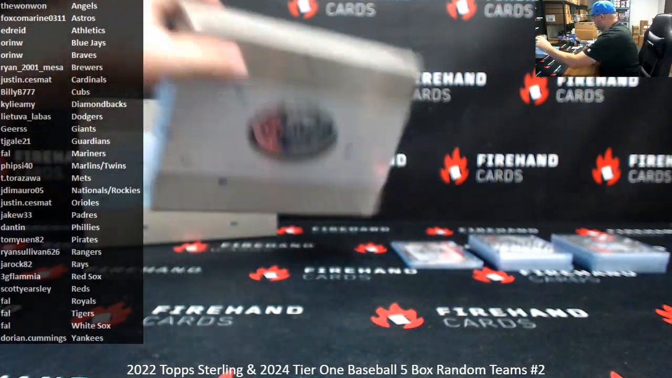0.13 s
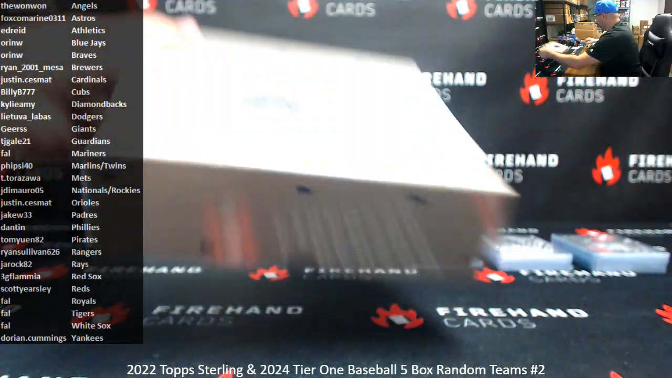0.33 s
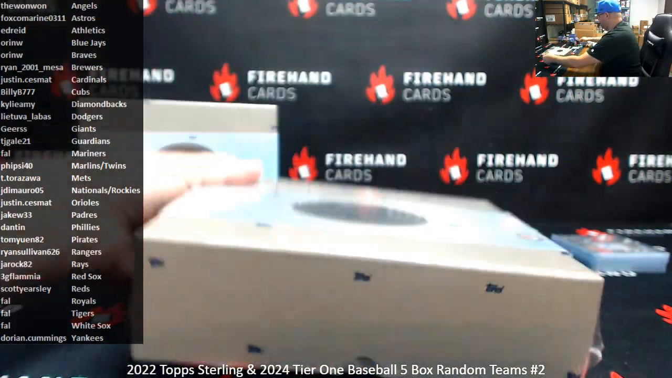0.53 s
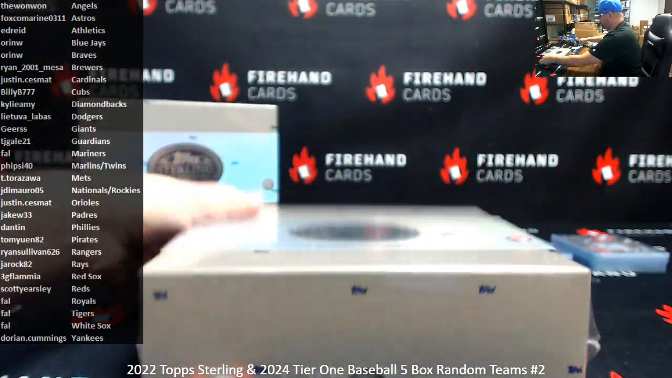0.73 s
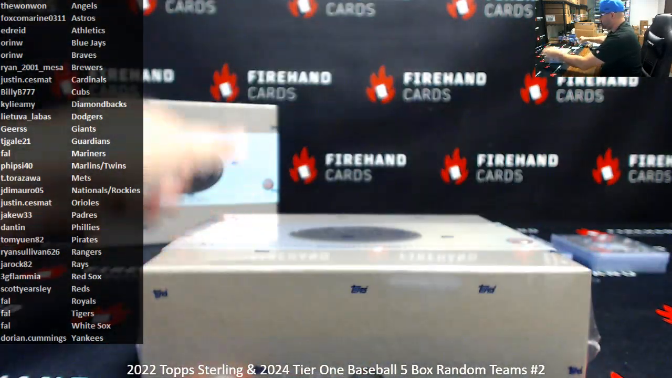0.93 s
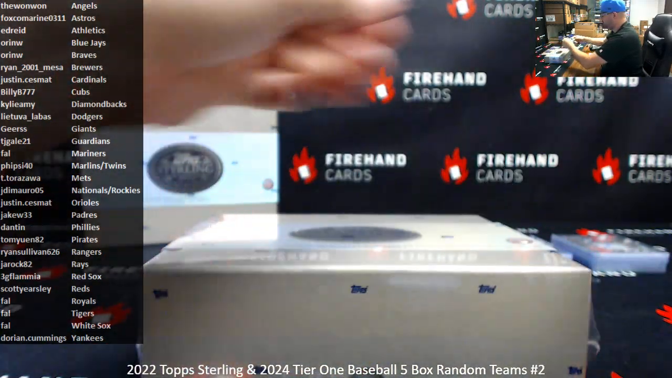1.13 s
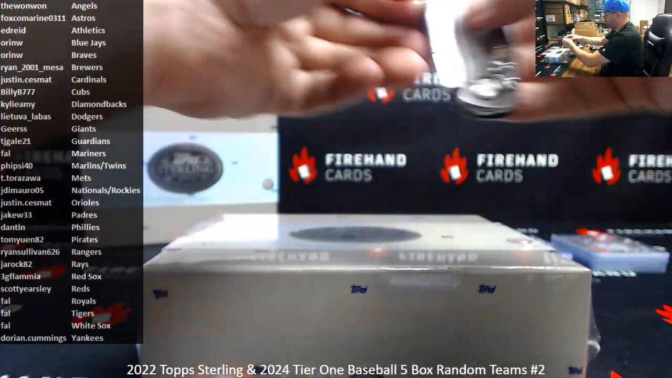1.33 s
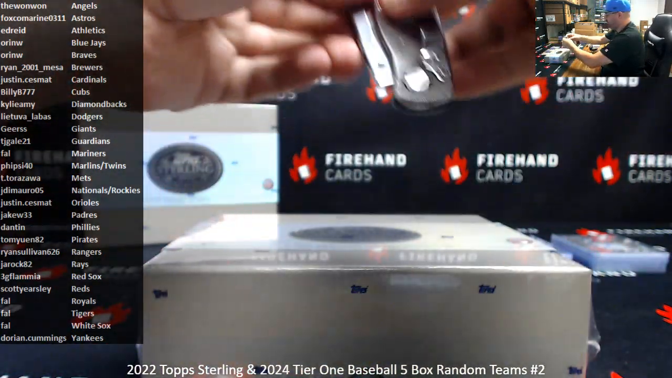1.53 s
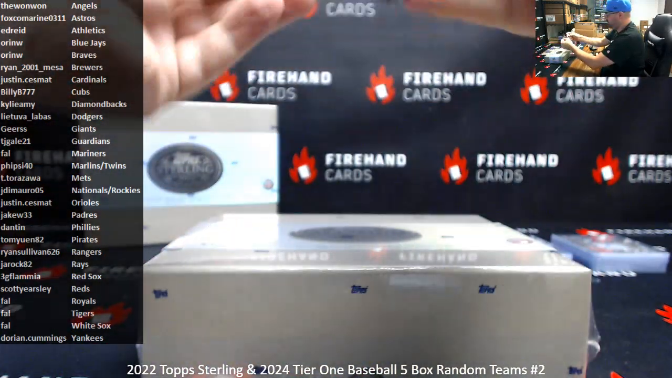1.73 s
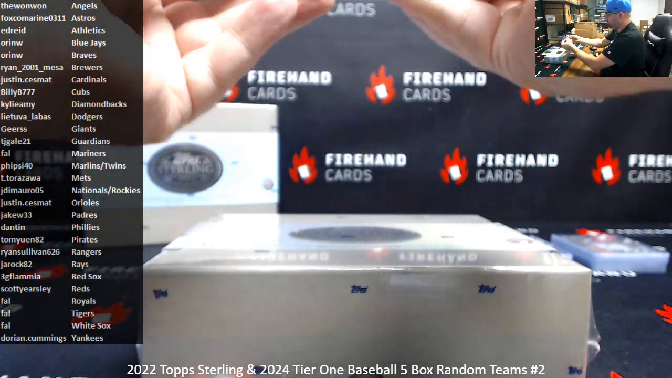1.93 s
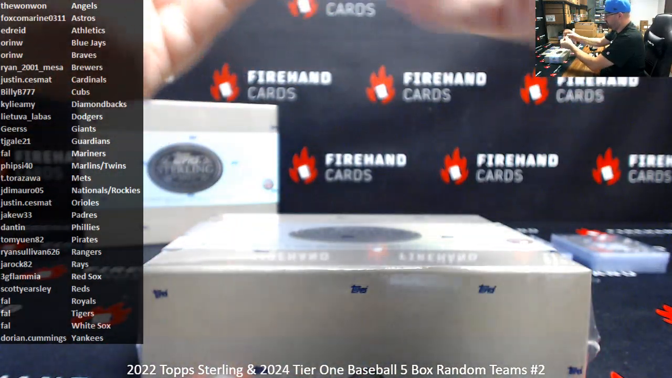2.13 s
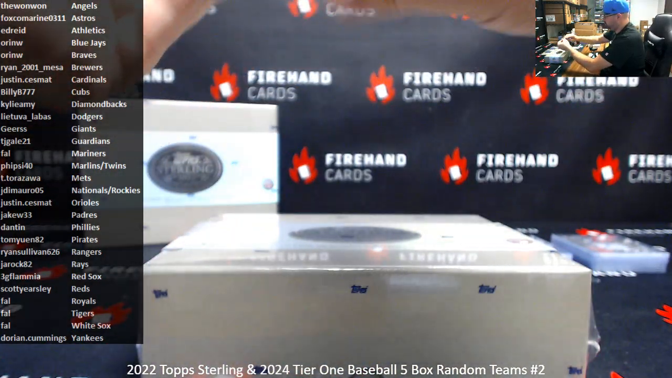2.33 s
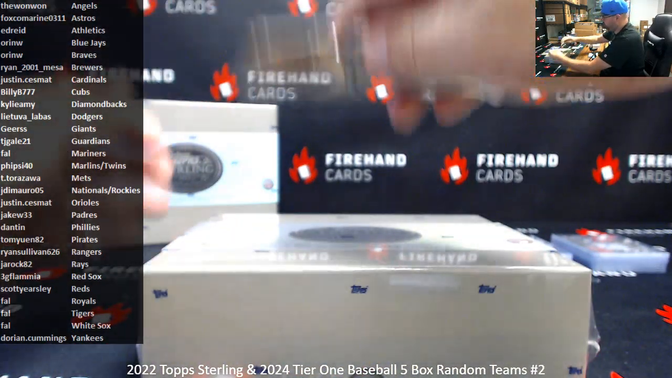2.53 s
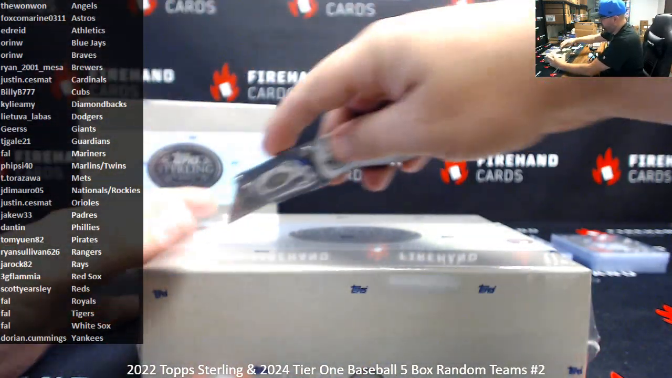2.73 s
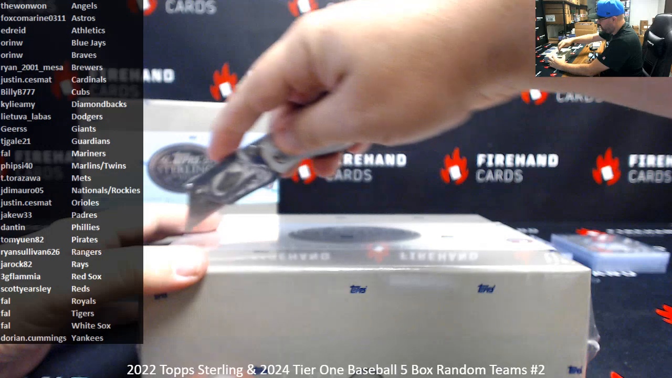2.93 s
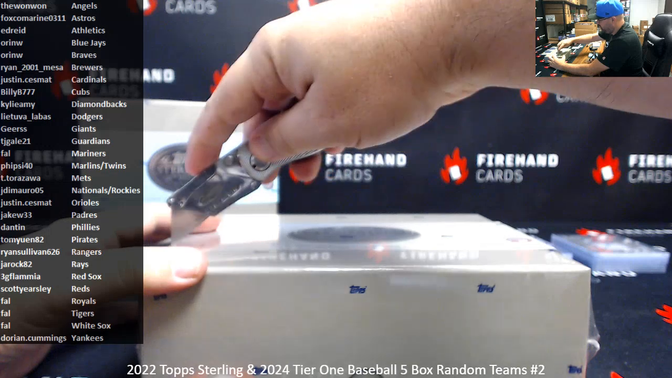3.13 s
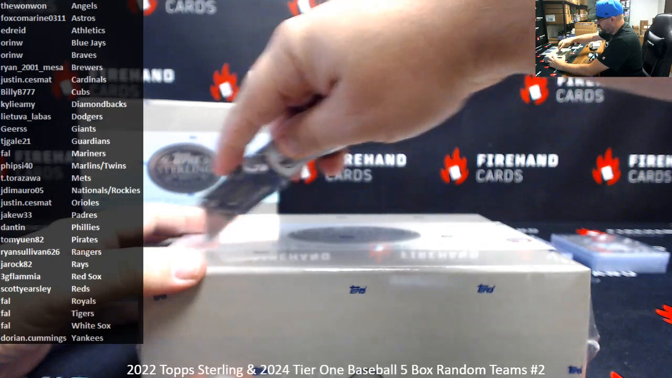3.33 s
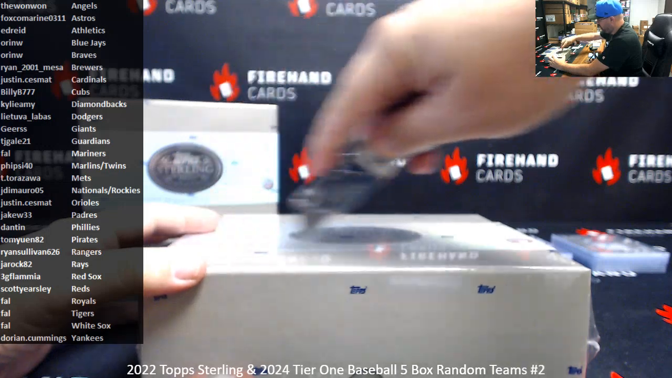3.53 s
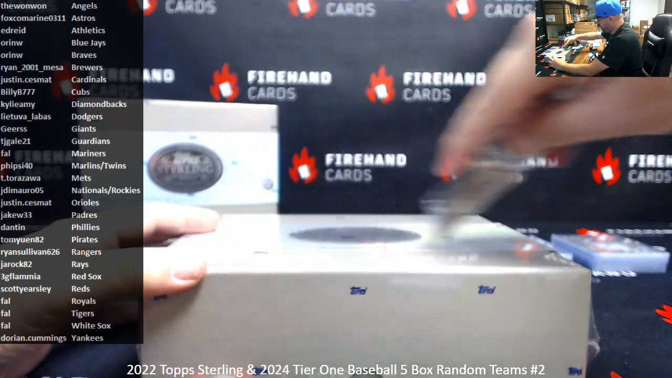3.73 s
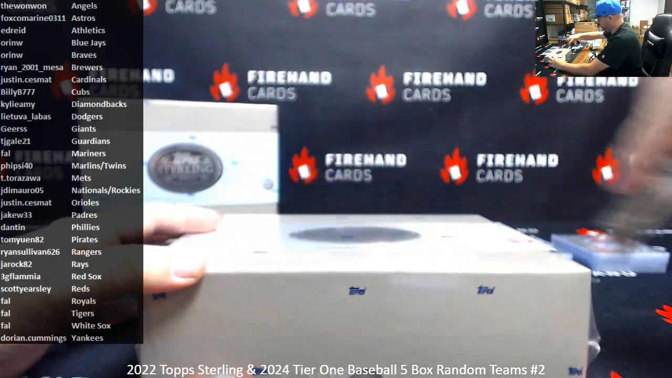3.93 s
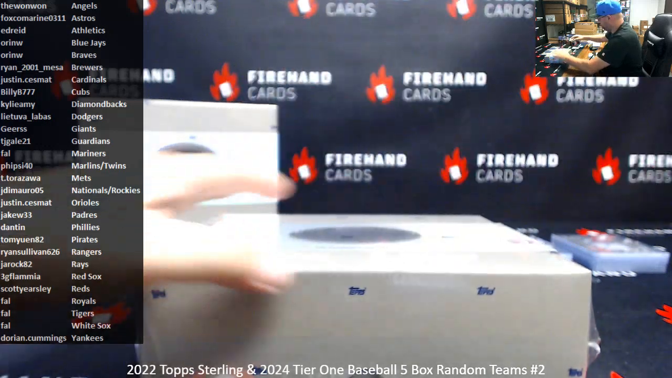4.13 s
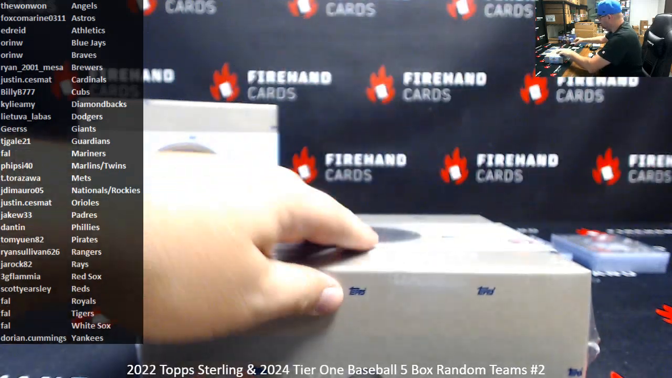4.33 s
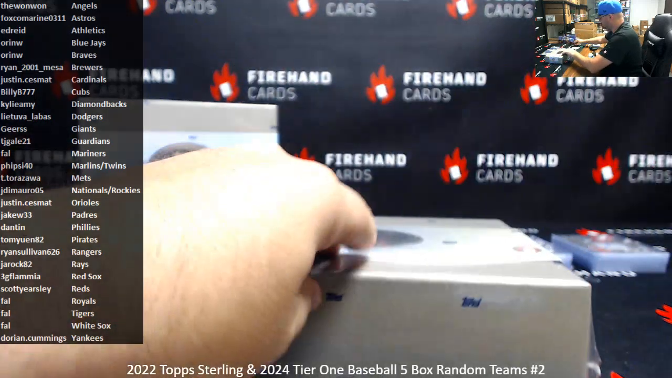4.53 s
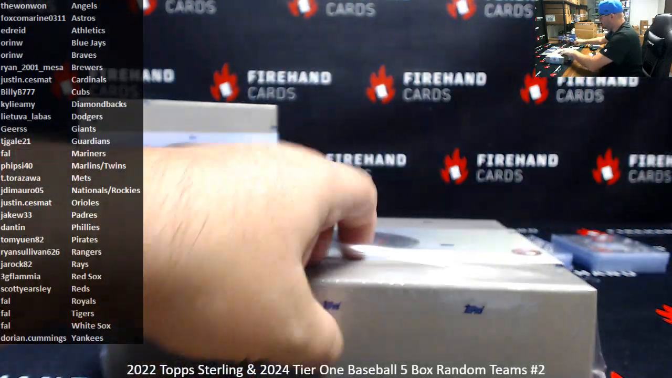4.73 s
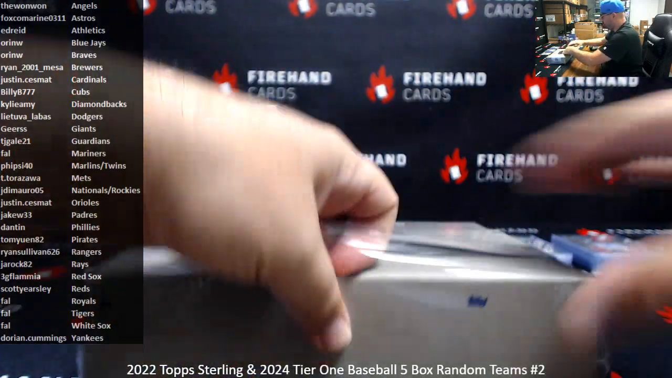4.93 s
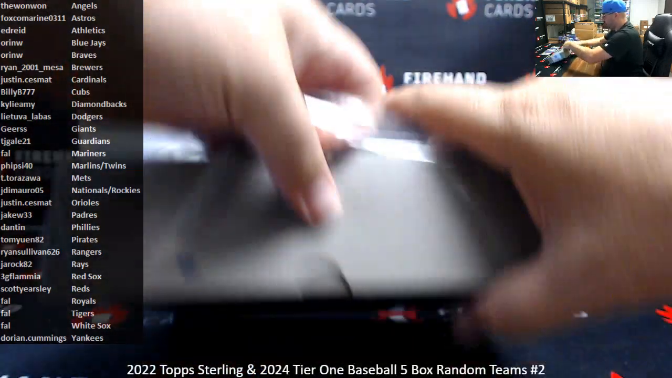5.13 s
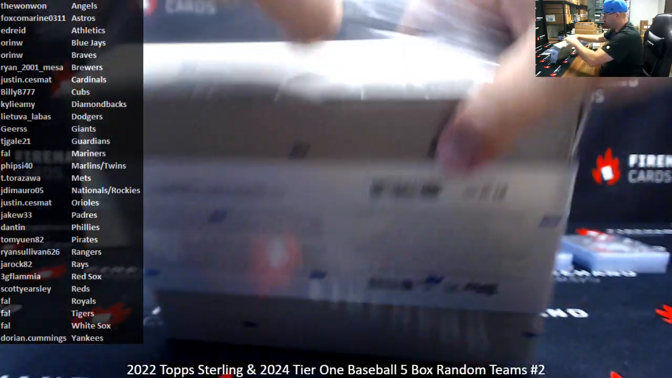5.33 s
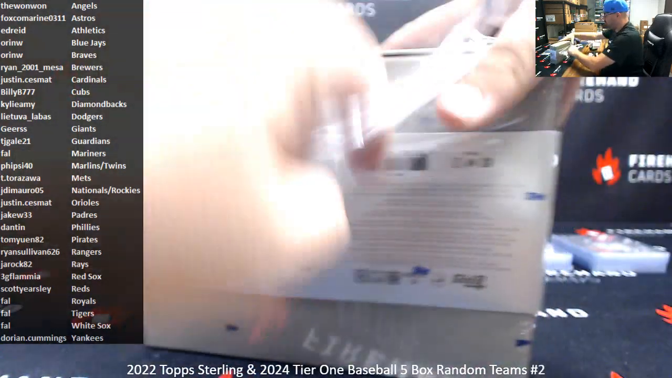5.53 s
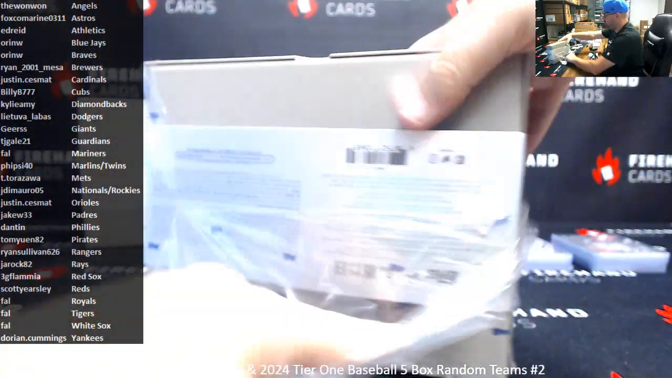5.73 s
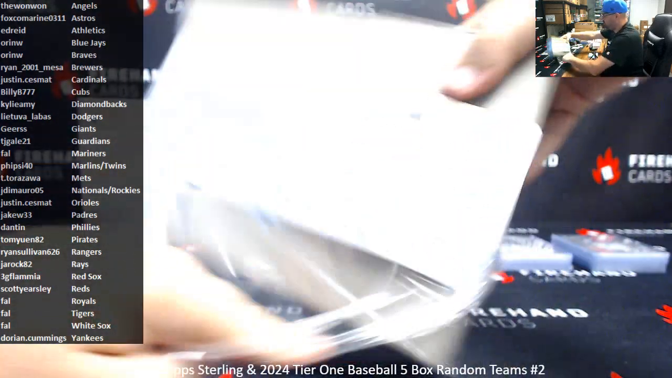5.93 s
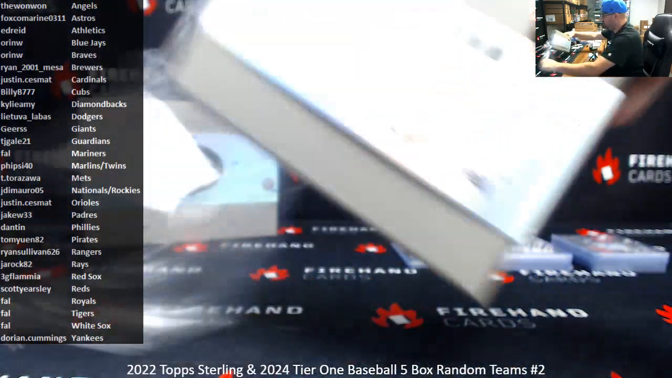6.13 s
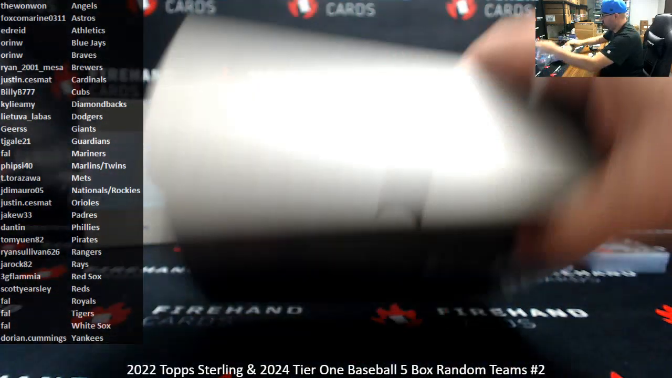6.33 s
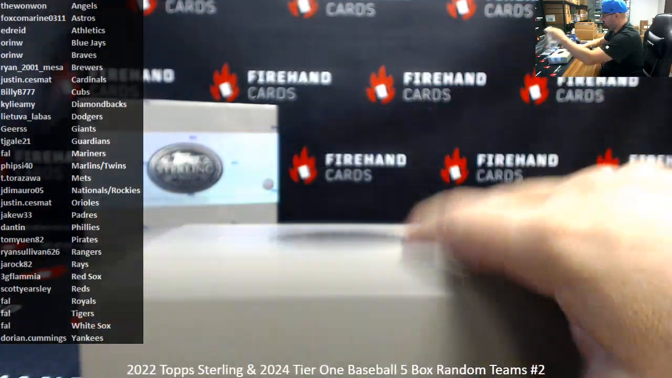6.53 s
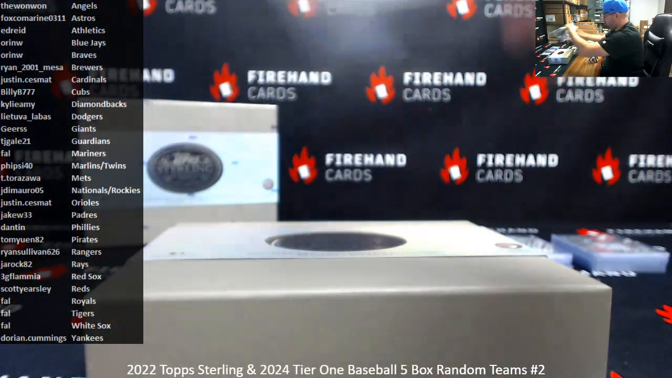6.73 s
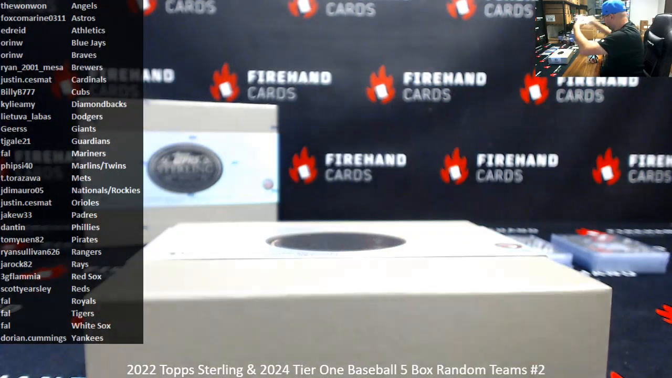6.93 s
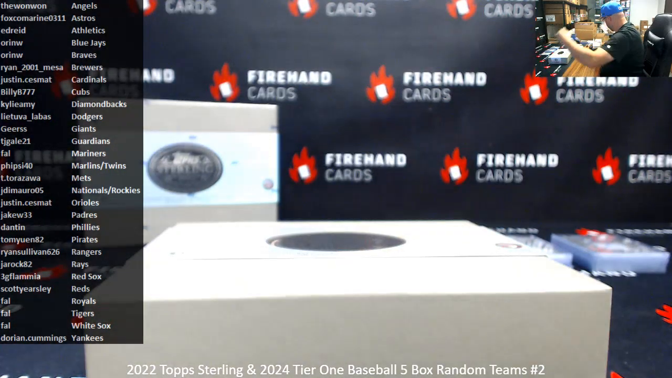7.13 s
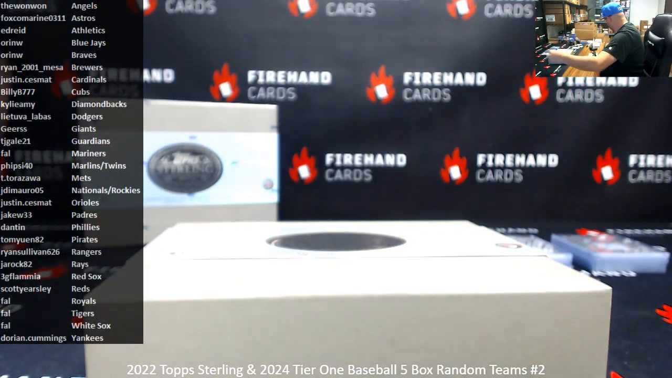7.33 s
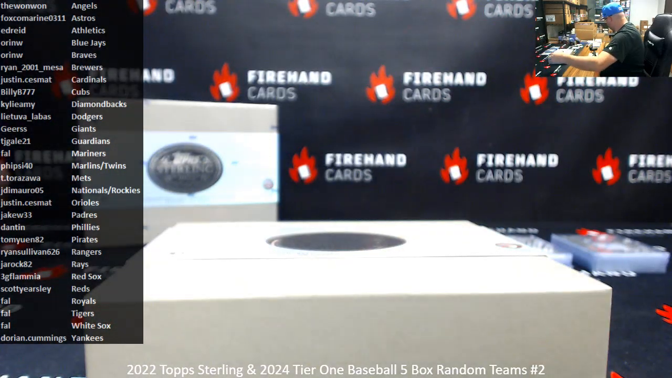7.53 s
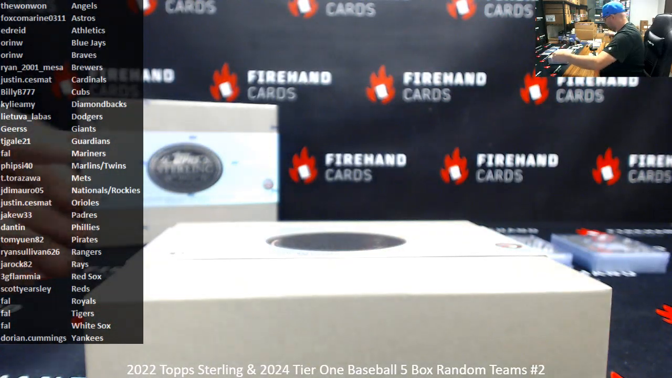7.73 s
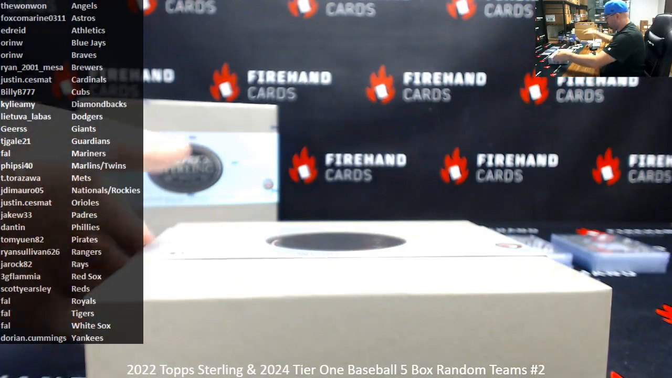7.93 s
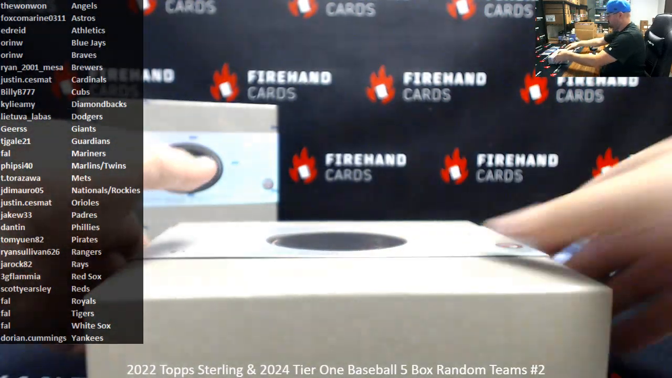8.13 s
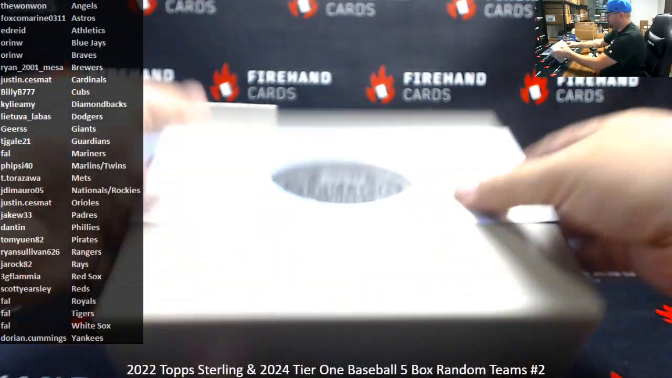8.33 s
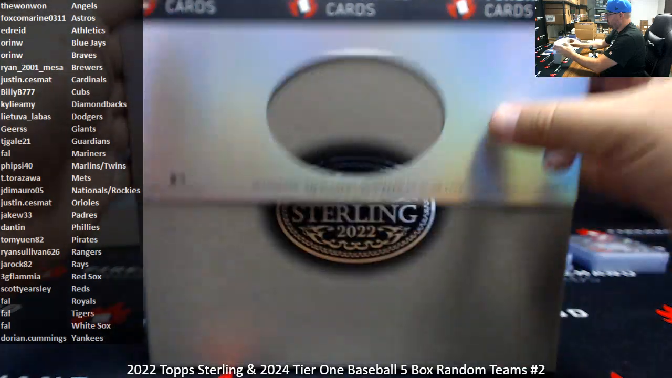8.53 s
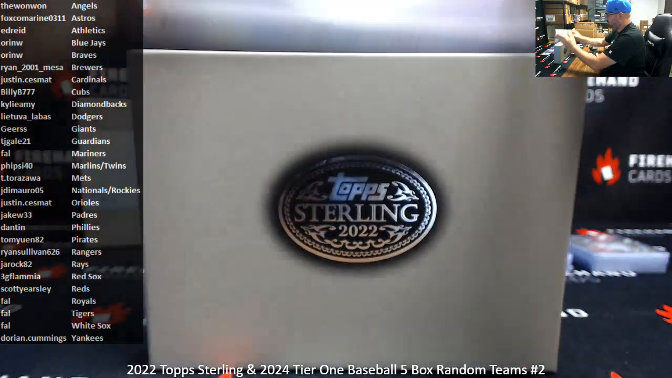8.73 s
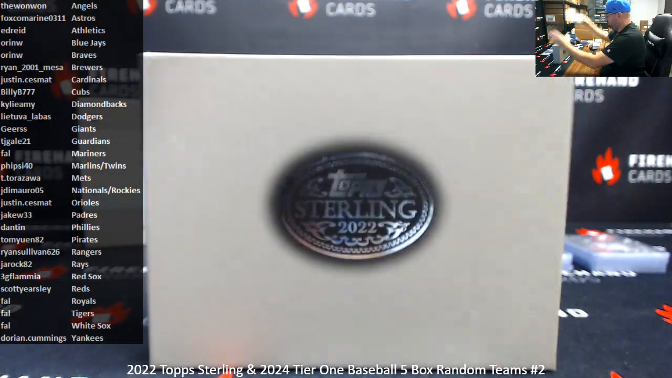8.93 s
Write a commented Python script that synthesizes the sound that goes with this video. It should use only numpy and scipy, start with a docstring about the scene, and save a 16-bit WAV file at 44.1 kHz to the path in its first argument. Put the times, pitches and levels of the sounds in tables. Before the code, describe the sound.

A wrapped cardboard box thumps onto a table, a folding knife squeaks and snaps open, slits the film, then crackling wrap is pulled off.

```python
"""A shrink-wrapped cardboard box is set down on a table in a small room, close to the microphone.
A folding knife squeaks open, locks with a snap and slits the wrap; the film is pulled off, crackling.
The bare box is knocked down on the table, then tipped up again, rubbing under the fingers.
Blows ring the box's modes, trains of tiny slips make the rubbing and cutting, sines squeak and ring
as steel, and shaped noise gives the cracks, the hush and the sway of the table."""
import sys
import numpy as np
from scipy import signal
from scipy.fft import rfft, irfft, next_fast_len
from scipy.io import wavfile

SR = 44100
rng = np.random.default_rng(int(sys.argv[2]) if len(sys.argv) > 2 else 0)


def log_audio(samples):
    """Write samples as a 16-bit WAV file to the path given in sys.argv[1]."""
    # one column per channel
    frames = np.atleast_2d(samples).T
    # limit to full scale, then quantise
    limited = np.clip(frames, -1, 1)
    pcm = np.round(limited * 32767).astype(np.int16)
    wavfile.write(sys.argv[1], SR, pcm)


N = 400869
TIME = np.arange(N) / SR  # s

# Levels in the tables are relative within their layer; each layer's function trims the whole.
# blows on the box; an edge landing adds thud and clap:
# (t/s, hollow boom level/dB, table thud re boom/dB, wall clap re boom/dB)
BLOWS = [(0.107,-37,-17,-10), (0.362,-31.5,2,-2), (0.413,-39.5,-24,-8.5), (0.587,-49.5,9,-3.5),
         (0.595,-20.5,-12.5,-19), (2.975,-57,10.5,-5), (3.749,-59,16.5,12), (4.159,-61,13,2),
         (4.511,-40,-3.5,-11), (4.64,-35.5,0.5,-4.5), (5.047,-31,1.5,-6), (5.192,-39,3,-8),
         (5.28,-36,-13,-10.5), (5.441,-33.5,-7.5,-11), (5.591,-49.5,-6,-15), (5.877,-37,-7.5,-15.5),
         (6.239,-35.5,3.5,-7.5), (6.291,-23.5,1,-0.5), (6.415,-10.5,-5,-11.5), (6.432,-19,-18,-21),
         (8.025,-60.5,15,6), (8.098,-26.5,-11.5,-20), (8.329,-29.5,-0.5,-5), (8.344,-17,-3.5,-14.5),
         (8.368,-15,-10.5,-15), (8.404,-40,10,-12), (8.843,-42.5,-4,-12), (9.033,-52.5,7.5,-3.5),
         (9.065,-43,-2,-11)]
# what box and table ring with: (f/Hz, level/dB, t60/s)
BOX_MODES = [(70.3, -6, 0.36), (121.8, -1.5, 0.26), (142.6, 12.5, 0.11), (158.5, 7.5, .12),
             (226.8, 7.5, 0.14), (250, -2.5, 0.13), (317, 1.5, 0.094), (398.7, 3.5, 0.096),
             (547, -5, 0.076), (697, 0, 0.061), (800, -8, 0.076)]
# spectrum of edge and walls clapping: (f/Hz, level/dB)
CLAP_SPECTRUM = [(150, -35), (350, 6.5), (750, 3.5), (1100, -13), (2000, -15), (4000, -32), (12000, -55)]
# sharp snaps of film, fingernails and box edges: (t/s, level/dB, treble re level/dB)
SNAPS = [(0.139,-52.5,-30), (0.3663,-36,-6.5), (3.119,-53.5,-17), (4.446,-43.5,-4), (4.642,-37,-14),
         (4.6692,-37,-10), (4.744,-44.5,-15), (4.9683,-44.5,-2), (5.0093,-37,-1), (5.1447,-26,-14),
         (5.439,-18.5,-4.5), (5.488,-24.5,-4), (5.6805,-39,-6.5), (5.8605,-17,-3.5), (6.297,-31.5,-34),
         (6.4161,-30.5,-28), (6.605,-40,-5), (8.6749,-38.5,-9)]
# spectrum of the crack in the card: (f/Hz, level/dB)
SNAP_BODY_SPECTRUM = [(200, -5.5), (600, -1), (1100, -4), (1800, 0.5), (2800, -3.5), (5000, -12),
                      (9000, -25.5)]
# spectrum of its bright edge: (f/Hz, level/dB)
SNAP_TOP_SPECTRUM = [(1500, -59), (4000, 0), (7500, 4.5), (10000, -5), (15500, -8)]
# fingers skid briefly on the box:
# (t/s, length/s, pitch of the rubbed panel f/Hz, level/dB, rasp re level/dB)
SCUFFS = [(0.14, 0.015, 1610, -52, -11), (2.159, 0.052, 5000, -73.5, -12), (4.419, 0.023, 1700, -62.5, -2),
          (5.381, 0.038, 1690, -54, 6), (6.116, 0.14, 220, -50, -17.5), (7.156, 0.049, 2240, -60, 4),
          (8.234, 0.038, 1500, -54.5, -6), (8.275, 0.02, 1650, -56, -11), (8.551, 0.042, 1420, -54.5, 3),
          (8.617, 0.034, 1490, -58.5, 7), (8.671, 0.012, 2030, -50, -4), (8.675, 0.044, 700, -51, -1.5),
          (8.933, 0.03, 2650, -58.5, -9)]
# strokes of the hands over film and card:
# (start t/s, length/s, fizz level at mid-stroke/dB, rasp re fizz/dB, swell over the stroke/dB)
STROKES = [(0.009,0.37,-69.5,9,10), (0.454,0.12,-66.5,-2.5,5.5), (2.43,0.19,-79,-9,16),
           (4.18,0.29,-68.5,-4,-6.5), (4.415,0.29,-65.5,0.5,12), (4.76,0.29,-73,-1.5,0),
           (4.982,0.063,-53,3.5,1), (5.105,0.32,-54.5,-0.5,-11.5), (5.332,0.17,-48,-1.5,5.5),
           (5.616,0.27,-58,-1,16), (5.855,.19,-46,-0.5,-19), (6.056,0.14,-50,-4.5,-2.5),
           (6.224,0.45,-61.5,-2,-10.5), (6.588,.155,-49,-4,7), (6.835,0.26,-64.5,-2,-2),
           (7.05,.14,-58.5,1,11.5), (7.242,0.56,-73.5,6.5,-12), (7.755,0.14,-62,-22.5,-10),
           (8.002,0.52,-69,-0.5,-18.5), (8.228,0.33,-52,-8,-2.5), (8.607,0.02,-52,4,-7.5),
           (8.832,0.11,-63,-5,5), (8.99,.1,-71,4.5,-10)]
# spectrum of slips on the film: (f/Hz, level/dB)
FIZZ_SPECTRUM = [(1500, -16.5), (3300, -3.5), (5000, 0), (7500, 2), (10000, -4.5), (13000, -4.5),
                 (15800, -8)]
# spectrum of slips on the card: (f/Hz, level/dB)
RASP_SPECTRUM = [(120, -40.5), (300, -5), (700, 3), (1150, -6), (1900, -2.5), (3200, -5.5), (5000, -11),
                 (9000, -34)]
# resonances of the hollow box under rubbing and cutting: (f/Hz, width/Hz, level/dB)
HOLLOW_MODES = [(157, 26, -0.5), (215, 27, -1), (278.6, 12.6, -5), (336, 43, -3)]
# resonances of the lid under the blade: (f/Hz, width/Hz, level/dB)
LID_MODES = [(452, 80, 0), (590, 110, -1), (740, 120, -1), (900, 120, 0), (1240, 170, -7), (1450, 200, -10)]
# spectrum of the tearing film: (f/Hz, level/dB)
TEAR_SPECTRUM = [(700, -18), (1400, 1), (1900, 3.5), (2150, -1.5), (2450, -1), (3000, -5.5), (3500, -11),
                 (5500, -13.5), (8000, -19), (15000, -28.5)]
# the knife's pivot sticks and slips:
# (t/s, length/s, pitch f/Hz, level/dB, octave re pitch level/dB, roughness/0-1)
SQUEAKS = [(1.416, 0.0081, 5840, -32.5, -20, 0.38), (1.418, 0.011, 6390, -34.5, -17, 0.3),
           (1.53, 0.013, 8580, -17.5, -37.5, 0.62), (1.535, 0.017, 7880, -24.5, -5, .4),
           (1.55, .018, 8070, -21.5, -28.5, .12), (1.561, .007, 7680, -31.5, -16.5, .4),
           (1.567, 0.0086, 7740, -21.5, -11.5, 0.2), (1.581, 0.012, 7620, -33.5, -14.5, .3),
           (1.575, 0.034, 2597, -40.5, -2, 0.3)]
# the blade clicks past its catch, then locks open: (t/s, level/dB)
LOCK_HITS = [(1.6672, -42.5), (1.7689, -12.5), (1.7704, -14), (1.7743, -11.5)]
# ringing modes of the knife's steel: (f/Hz, level/dB, t60/s)
STEEL_MODES = [(3300, -9, .2), (4197, -2, .25), (4277, 0, .27), (4380, -2, .24), (4540, -4, .2),
               (4690, -5, .2), (4830, -6, .2), (5422, -7, .2), (5698, -9, .2), (7600, -5, .11),
               (7830, -6, .11), (11550, -10, .1), (13500, -9, .12)]
# spectrum of steel knocking and scraping on steel: (f/Hz, level/dB)
CLACK_SPECTRUM = [(600, -34.5), (1000, -26), (1900, -23), (2500, -12.5), (3200, -5), (4350, 3.5),
                  (5100, -3.5), (5600, -1), (6500, -5), (7700, -1.5), (10500, -6.5), (13600, -10),
                  (15800, -16)]
# the hands lean on the table and set it swaying: (start t/s, length/s, level/dB)
LEANS = [(0.36, 0.25, -41.5), (2.53, 0.085, -42.5), (5.1, 0.52, -47.5), (6.4, 0.069, -37.5)]
# spectrum of the table's sway: (f/Hz, level/dB)
SWAY_SPECTRUM = [(15, -11.5), (25, -1.5), (34, 8.5), (46, -12), (66, -8), (100, -16), (200, -61)]
# spectrum of the steady room hush: (f/Hz, level/dB)
HUSH_SPECTRUM = [(12, -32), (20, 2.5), (93, -4.5), (130, -7.5), (162, -1.5), (187, -10.5), (227, -2.5),
                 (261, -16), (375, -9), (797, -20.5), (996, -23), (1280, -23), (3130, -35.5), (5030, -39),
                 (15800, -44)]
# decay of the small room's tail: (f/Hz, t60/s)
ROOM_T60 = [(100, 0.48), (250, 0.17), (1000, 0.18), (4500, .42), (8000, 0.33), (15000, 0.26)]

# a stroke grips quickly, swells or eases evenly, and dies away when the hand stops
GRIP_S, RELEASE_DB_PER_S = 0.031, 165
# the blade's one run through the wrap; as it gathers speed the drag swells a little, the tearing a lot
CUT_START_S, CUT_LENGTH_S, CUT_GRIP_S, CUT_RELEASE_DB_PER_S = 3.0904, 0.6154, 0.17, 380
DRAG_SWELL_DB, TEAR_SWELL_DB = 6.5, 19
# the box booms as the blade crosses the slack middle of the lid
SLACK_S, SLACK_HALF_WIDTH_S, SLACK_LIFT_DB = 3.54, 0.11, 12.5
# dry steel slides on steel as the blade swings out
SWING_START_S, SWING_LENGTH_S, SWING_DB, SWING_SWELL_DB = 1.447, .11, -68.5, 22.5
SWAY_RISE_S, SWAY_FADE_DB_PER_S = 0.024, 50
HUSH_DB = -58
EDGE_HZ = 15900  # upper band limit


def knocks(ring_db=-2, clap_db=-9, crack_db=-1, swell_cycles=1.5, clap_t60=0.19, crack_t60=0.013, boom_db=1):
    """Where a blow lands decides how much table, hollow and walls each ring."""
    rings, claps = np.zeros((2, N))
    modes = []
    for hz, db, t60 in BOX_MODES:
        # the card gives way before it rings: each mode takes about a cycle to swell
        swell = 1 - np.exp(-TIME[:SR // 2] * hz / swell_cycles)
        modes.append((hz, amp(db) * ring(hz, t60) * swell))
    for s, db, thud_db, wall_db in BLOWS:
        share = [(150, thud_db), (215, boom_db), (260, 0), (450, wall_db)]  # (f/Hz, level/dB)
        box = sum(amp(read(share, hz)) * mode for hz, mode in modes)
        add(rings, s, amp(db) * box)
        # the edge cracks at once on the table; the walls rattle on
        crack = amp(crack_db) * burst(crack_t60)
        rattle = amp(clap_db) * burst(clap_t60)
        add(claps, s, amp(db + wall_db) * (crack + rattle))
    return room(amp(ring_db) * rings + colour(claps, CLAP_SPECTRUM), early_db=-19, late_db=-7.5)


def snaps(body_db=-6, top_db=-5, snap_t60=0.033):
    """Buckling film and nail taps: a crack in the card with a bright edge."""
    body, top = np.zeros((2, N))
    for s, db, treble_db in SNAPS:
        # the card takes the energy that the treble leaves
        card_share = np.sqrt(max(1 - amp(treble_db) ** 2, .1))
        add(body, s, amp(db) * card_share * burst(snap_t60))
        add(top, s, amp(db + treble_db) * burst(snap_t60))
    card = amp(body_db) * colour(body, SNAP_BODY_SPECTRUM)
    edge = amp(top_db) * colour(top, SNAP_TOP_SPECTRUM)
    return room(card + edge, early_db=-2, late_db=-21.5)


def scuffs(width=0.21):
    """A skid is a short run of slips that sings in one panel; width is relative to its pitch."""
    out = np.zeros(N)
    drive = slips(per_s=5000, spread_db=2, clump_db=1)
    rasp = colour(drive, RASP_SPECTRUM)
    for s, length, hz, db, rasp_db in SCUFFS:
        span = slice(round(s * SR), round((s + length) * SR))
        singing = panel(drive[span], [(hz, width * hz, 0)])
        skid = singing + amp(rasp_db) * unit(rasp[span])
        add(out, s, amp(db) * skid * signal.windows.tukey(len(skid), .7))
    return room(out, early_db=-7.5, late_db=-21)


def rubbing(fizz_db=-2, rasp_db=-2, hollow_db=-4):
    """Dense slips fizz on the film; coarser ones rasp in the card; small buckles crackle in both."""
    on_film, on_card = np.zeros((2, N))
    for start, length, db, card_db, swell_db in STROKES:
        gain = amp(db) * stroke(start, length, swell_db)
        # where strokes overlap, the louder one is heard
        on_film = np.maximum(on_film, gain)
        on_card = np.maximum(on_card, amp(card_db) * gain)
    buckles = slips(per_s=450, spread_db=2.5, clump_db=5.0)
    fine = unit(buckles + 1.67 * slips(per_s=11000, spread_db=0.5, clump_db=2.5))
    coarse = unit(buckles + slips(per_s=3600, spread_db=0.5, clump_db=0.5))
    fizz = amp(fizz_db) * colour(fine * on_film, FIZZ_SPECTRUM)
    rasp = amp(rasp_db) * colour(coarse * on_card, RASP_SPECTRUM)
    # the coarse slips also make the hollow of the box drone
    drone = panel(colour(coarse, CLAP_SPECTRUM), HOLLOW_MODES[1:3])
    hollow = amp(hollow_db) * drone * on_card
    return moving_room(fizz + rasp, early_db=1.5, late_db=-10) + hollow


def slitting(hollow_db=-56, drag_db=-47.5, tear_db=-56):
    """The blade's tip chatters along the lid and tears the film as it gathers speed."""
    def run(swell_db):
        """Gain of the blade's one run."""
        return stroke(CUT_START_S, CUT_LENGTH_S, swell_db, CUT_GRIP_S, CUT_RELEASE_DB_PER_S)
    drag = slips(per_s=2000, spread_db=1.5, clump_db=1.5)
    slack = amp(SLACK_LIFT_DB * np.exp(-((TIME - SLACK_S) / SLACK_HALF_WIDTH_S) ** 2))
    hollow = amp(hollow_db) * panel(drag, HOLLOW_MODES) * run(0) * slack
    lid = amp(drag_db) * panel(drag, LID_MODES) * run(DRAG_SWELL_DB)
    card = signal.lfilter(*signal.butter(2, 2800, fs=SR), hollow + lid)  # card soaks up the treble
    tearing = unit(drag + slips(per_s=4300, spread_db=2.0, clump_db=5.5))
    tear = amp(tear_db) * colour(tearing, TEAR_SPECTRUM) * run(TEAR_SWELL_DB)
    return room(card + tear, early_db=-2.5, late_db=-11.5)


def pivot(wander=.06, scratch=.25, wander_hz=700, scratch_hz=1100):
    """Dry steel rasps as it turns, and squeaks in short jumps from one pitch to the next."""
    swing = stroke(SWING_START_S, SWING_LENGTH_S, SWING_SWELL_DB)
    out = colour(rng.standard_normal(N), CLACK_SPECTRUM) * amp(SWING_DB) * swing
    for s, length, hz, db, octave_db, rough in SQUEAKS:
        size = int(length * SR)
        pitch = hz * (1 + wander * rough * drift(wander_hz, size=4096)[:size])
        phase = 2 * np.pi * np.cumsum(pitch) / SR
        chatter = 1 + scratch * rough * drift(scratch_hz, size=4096)[:size]
        tone = np.sin(phase) + amp(octave_db) * np.sin(2 * phase)
        add(out, s, amp(db) * tone * chatter * signal.windows.tukey(size, .6))
    return room(out, early_db=-4.5, late_db=-17.5)


def lock(clack_db=-6, steel_db=-24, clack_t60=0.027):
    """The blade hits its stop, the lock drops in, and the steel rings."""
    hits, steel = np.zeros((2, N))
    for s, db in LOCK_HITS:
        add(hits, s, amp(db) * burst(clack_t60))
    s, db = LOCK_HITS[2]  # the ringing starts at this hit
    ringing = sum(amp(mode_db) * ring(hz, t60) for hz, mode_db, t60 in STEEL_MODES)
    add(steel, s, amp(db) * ringing)
    clack = amp(clack_db) * colour(hits, CLACK_SPECTRUM)
    return room(clack, early_db=0.5, late_db=-15) + amp(steel_db) * steel


def background(sway_db=-1, jolt_db=-29, jolt_s=0.057):
    """Steady room hush, and the table's sway after each lean and thud, carried up the microphone stand."""
    hush = amp(HUSH_DB) * colour(rng.standard_normal(N), HUSH_SPECTRUM)
    sway = unit(colour(rng.standard_normal(N), SWAY_SPECTRUM, size=16384))
    jolts = [(s, jolt_s, db + thud_db + jolt_db) for s, db, thud_db, _ in BLOWS]
    power = np.zeros(N)
    for s, length, db in LEANS + jolts:
        push = amp(db) * stroke(s, length, 0, SWAY_RISE_S, SWAY_FADE_DB_PER_S)
        power += push ** 2
    return hush + amp(sway_db) * sway * np.sqrt(power)


def room(x, early_db, late_db, early_t60=.13):
    """Adds quick reflections from table and shelves, then the small room's tail."""
    t = np.arange(SR * 3 // 5) / SR
    sparse = rng.random((2, len(t))) < 1 / 8
    near, far = rng.standard_normal((2, len(t))) * sparse
    early = near * (t > .0015) * amp(-60 * t / early_t60)
    # the tail dies at its own rate in each band
    hz, when, z = signal.stft(far * (t > .012), SR, nperseg=256)
    decay = amp(-60 * when / read(ROOM_T60, hz)[:, None])
    late = signal.istft(z * decay, SR, nperseg=256)[1][:len(t)]
    echo = amp(early_db) * early / np.linalg.norm(early) + amp(late_db) * late / np.linalg.norm(late)
    return x + signal.oaconvolve(x, echo)[:N]


def moving_room(x, early_db, late_db, count=3):
    """A moving source meets ever different reflections: it fades in turn between several echo patterns."""
    turn = 2 * np.pi * 3 * TIME
    out = np.zeros(N)
    for k in range(count):
        share = np.cos(turn + np.pi * k / count) ** 2 * 2 / count  # the shares sum to 1
        out += room(x * share, early_db, late_db)
    return out


def stroke(start, length, swell_db=0, grip_s=GRIP_S, release_db_per_s=RELEASE_DB_PER_S):
    """Gain over time of one movement: grip, even swell (0 dB at mid-stroke), release."""
    t = np.maximum(TIME - start, 0)
    swell = swell_db * (np.minimum(t / length, 1) - .5)
    release = release_db_per_s * np.clip(t - length, 0, 2)
    return np.minimum(t / grip_s, 1) * amp(swell - release)


def slips(per_s, spread_db, clump_db, clump_hz=35):
    """Tiny stick-slip clicks, a few of them large, arriving in louder and softer clumps; rms 1."""
    clumps = drift(clump_hz, size=next_fast_len(N))[:N]
    sizes = amp(spread_db * np.minimum(rng.exponential(1, N), 4) + clump_db * clumps)
    happens = rng.random(N) < per_s / SR
    return unit(sizes * rng.choice([-1, 1], N) * happens)


def panel(x, modes):
    """Plays x through resonances (f/Hz, width/Hz, level/dB) of alternating sign; rms 1."""
    out = np.zeros(len(x))
    for k, (hz, width, db) in enumerate(modes):
        out += (-1) ** k * amp(db) * signal.lfilter(*signal.iirpeak(hz, hz / width, SR), x)
    return unit(out)


def burst(t60, size=4096):
    """A crack: noise that starts at full level and dies away."""
    return rng.standard_normal(size) * amp(-60 * np.arange(size) / SR / t60)


def ring(hz, t60, size=22050):
    """One dying mode."""
    t = np.arange(size) / SR
    return np.sin(2 * np.pi * hz * t) * amp(-60 * t / t60)


def drift(hz, size=N):
    """Smooth random motion of rms 1, mostly slower than hz."""
    f = np.fft.rfftfreq(size, 1 / SR)
    return unit(irfft(rfft(rng.standard_normal(size)) * np.exp(-(f / hz) ** 2), size))


def colour(x, points, size=4096):
    """Causal (minimum-phase) filter of unit energy with the given spectrum."""
    log_gain = np.log(amp(read(points, abs(np.fft.fftfreq(size, 1 / SR)))))
    taps = np.fft.ifft(np.exp(np.conj(signal.hilbert(log_gain)))).real[:size // 2]
    return signal.oaconvolve(x, taps / np.linalg.norm(taps))[:len(x)]


def read(points, hz):
    """A spectrum's value at hz, on a log axis."""
    f, value = np.transpose(points)
    return np.interp(np.log(hz + 1), np.log(f + 1), value)


def add(mix, s, sound):
    """Lays a sound into the mix at s seconds, cut at the mix's end."""
    part = mix[max(round(s * SR), 0):][:len(sound)]
    part += sound[:len(part)]


def amp(db):
    """Decibels to amplitude."""
    return 10 ** (np.asarray(db) / 20)


def unit(x):
    """Scales to rms 1."""
    return x / np.sqrt(np.mean(x ** 2) + 1e-20)


def scene():
    """Box, hands, knife and room together, on one channel."""
    box = knocks() + snaps() + scuffs() + rubbing()
    knife = slitting() + pivot() + lock()
    return (box + knife + background())[None]


def record(dry):
    """The recorder's band limit: a steep low-pass."""
    taps = signal.firwin(401, EDGE_HZ, window=("kaiser", 9), fs=SR)
    return signal.oaconvolve(dry, taps[None], "same")


dry = scene()
out = record(dry)
log_audio(out)
```